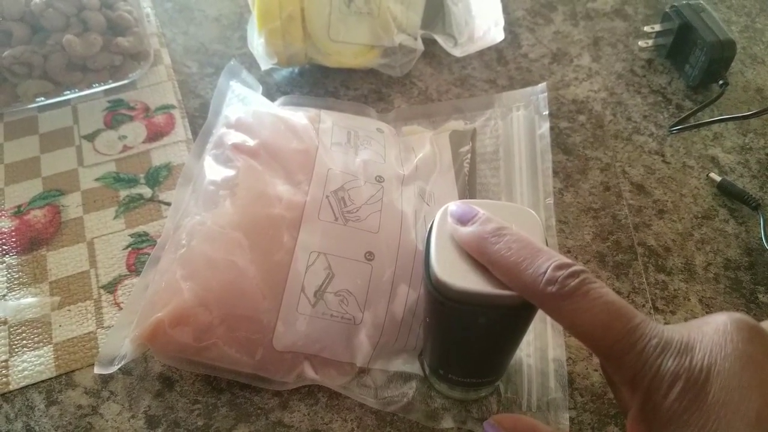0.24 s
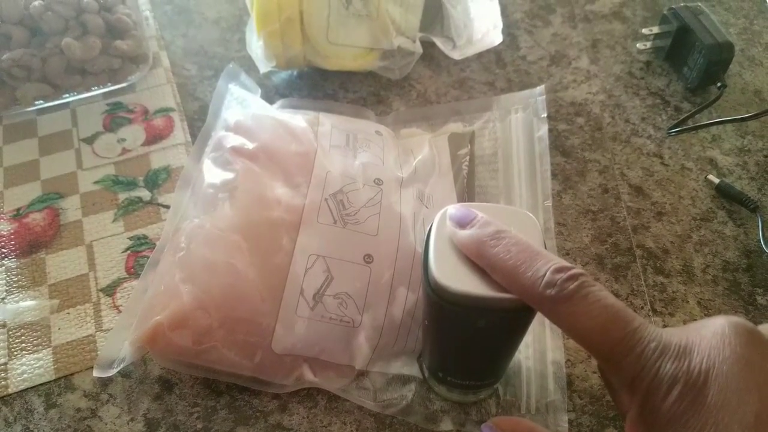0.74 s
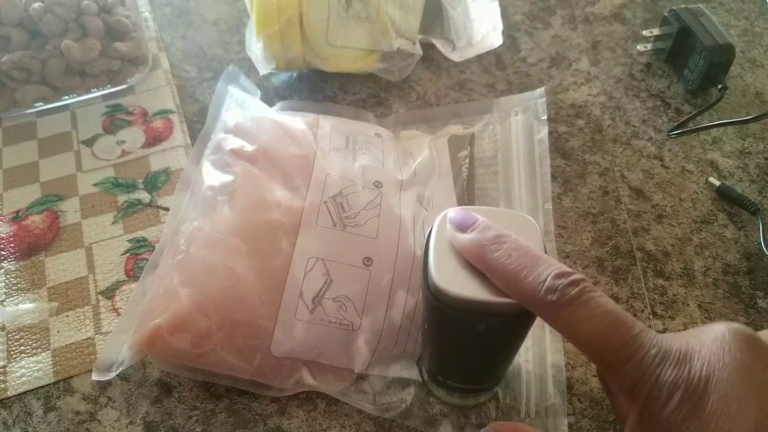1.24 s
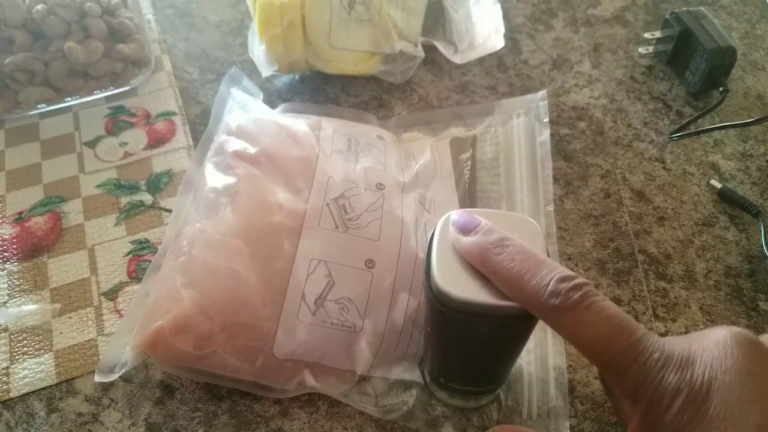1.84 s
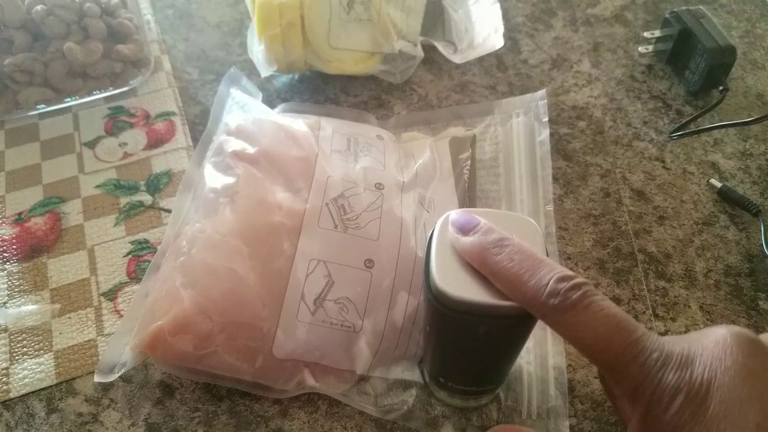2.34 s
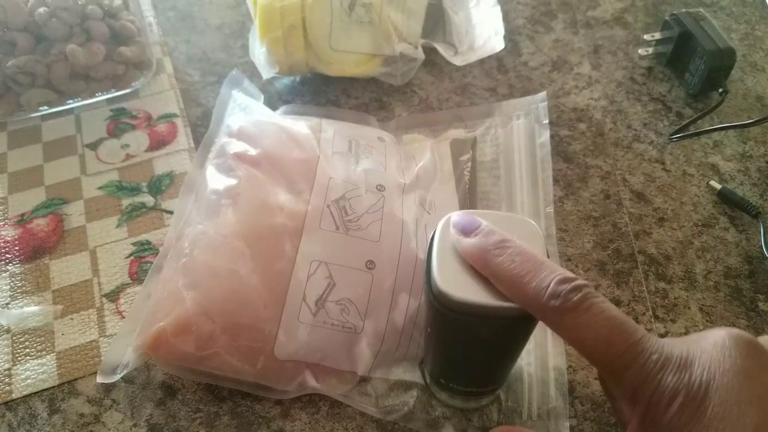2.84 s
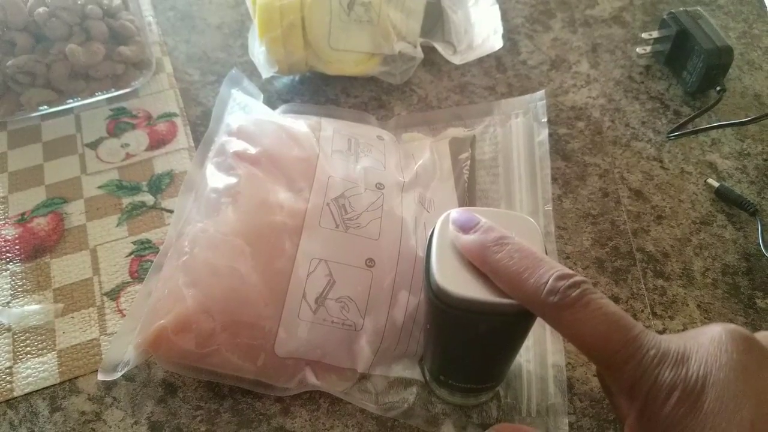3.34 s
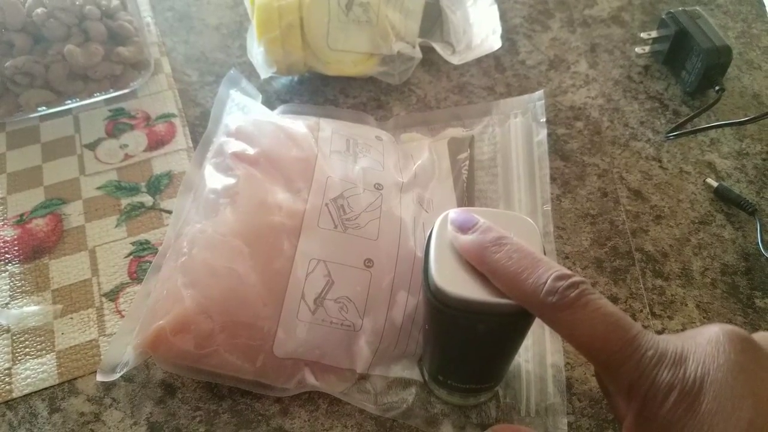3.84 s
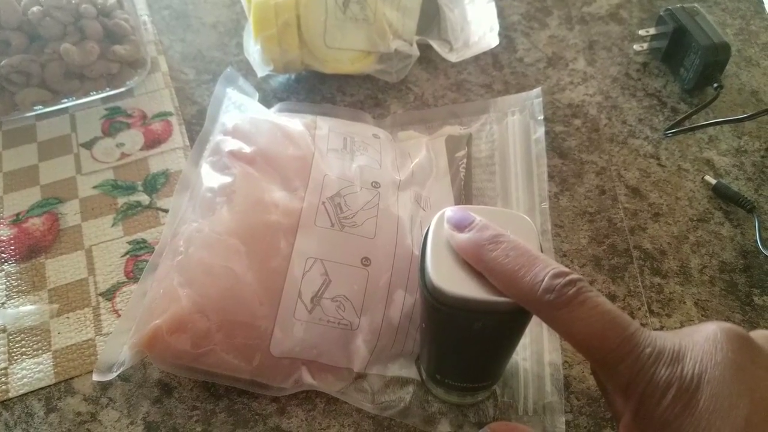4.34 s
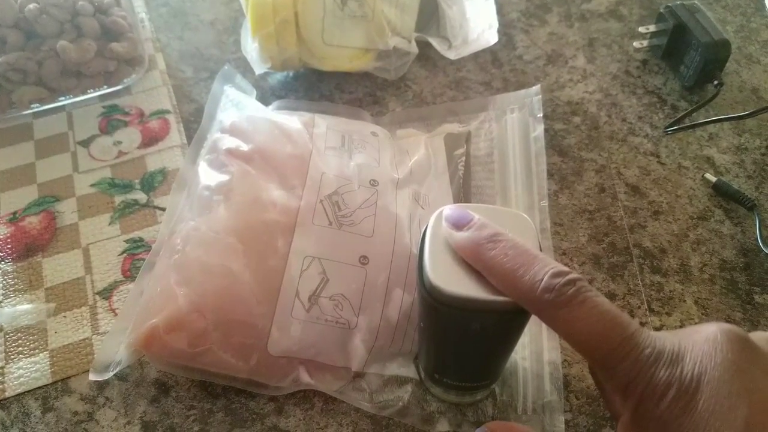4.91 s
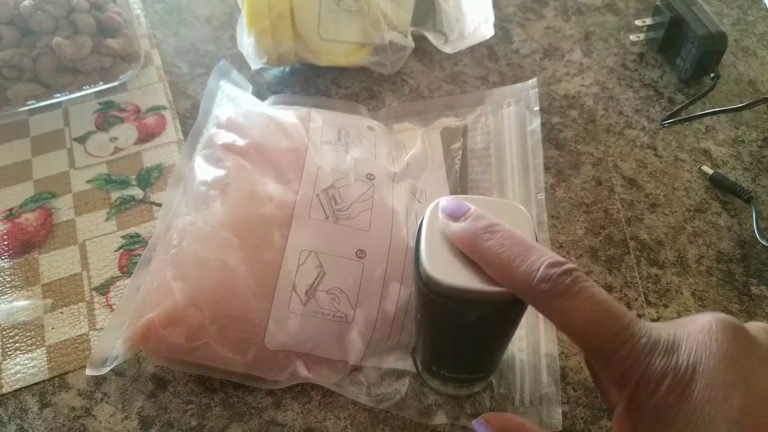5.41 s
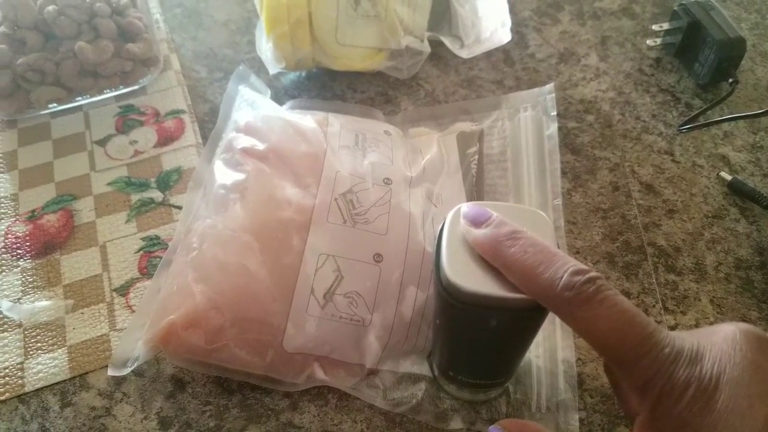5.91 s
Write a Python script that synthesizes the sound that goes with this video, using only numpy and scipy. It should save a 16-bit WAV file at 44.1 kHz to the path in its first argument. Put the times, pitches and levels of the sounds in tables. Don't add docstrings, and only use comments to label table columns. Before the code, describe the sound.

A small handheld vacuum pump buzzes steadily up close, hissing faintly and sagging slightly in pitch, with dull hollow wooden knocks further off.

```python
import sys
import numpy as np
from scipy import signal
from scipy.fft import rfft, irfft, next_fast_len
from scipy.io import wavfile
from scipy.ndimage import uniform_filter1d

SR = 44100
rng = np.random.default_rng(int(sys.argv[2]) if len(sys.argv) > 2 else 0)


def elevation(decibels):
    levels = np.asarray(decibels, float)
    return 10 ** (levels / 20)


def waveform_to_disk(signal):
    frames = np.transpose(np.atleast_2d(signal))
    scaled = np.clip(frames, -1, 1) * 32767
    samples = np.round(scaled).astype(np.int16)
    wavfile.write(sys.argv[1], SR, samples)


N = 272097

# time_s, stroke_hz
PUMP_SPEED = [(0.0, 198.5), (0.12, 197.1), (0.25, 196.0), (0.5, 195.2), (1.0, 194.4), (1.12, 193.8),
              (1.75, 193.7), (2.38, 193.6), (2.75, 193.2), (3.0, 192.4), (4.75, 192.5), (5.12, 191.9),
              (5.38, 192.3), (6.17, 192.3)]
# left_db, right_db, left_change_db, right_change_db
STROKE_LEVELS = [(-44.5, -44.5, -1, -1), (-44.5, -46.5, -4.0, -2.5), (-52.5, -51.5, 3.5, -2.5),
                 (-55, -59, 4.5, 6.5), (-56, -59.5, 3, 12), (-66.5, -77, 11, 16), (-57, -50.5, -6.5, -8.5),
                 (-57.5, -50.5, -5.0, -17.5), (-75, -51, 11, -19), (-54.5, -49.5, -4.0, -10.5),
                 (-55, -48.5, -42, -2.5), (-93, -57, 17, 1), (-87, -55, 20, 0), (-80.0, -57, 33, 5),
                 (-69.5, -60.5, 7.0, -20), (-61.5, -58, -2, 2)]
UNEVEN_ORDERS = (1, 4, 5, 7, 8, 10, 13, 14, 17, 23, 26, 28, 29, 31, 32, 34, 35, 37, 38, 40, 41, 43, 44)
# left_db, right_db, change_db
UNEVEN_LEVELS = [(-62, -65, 4), (-57, -61.5, 0.5), (-67, -65.5, 10), (-87, -69, 8), (-57.5, -85, -14),
                 (-58.5, -127, -0.5), (-69.5, -58.5, -4.5), (-75, -64, -9.5), (-68, -62, -7), (-96, -59, 8),
                 (-79, -71.5, 15), (-67.5, -52, -3.5), (-67, -65, 11), (-56.5, -54.5, 1),
                 (-57, -54.5, -11.5), (-87, -65, 0), (-62, -68, -6), (-55, -52, -9), (-55, -55, -8),
                 (-65, -66.5, -6), (-94, -60, 7), (-114, -68, 7), (-74.5, -62.5, 6)]
HUM_TIMING = [
    [(.013, .03, .017, .06), (.010, -.01, .027, .12)],
    [(-.146, -.23, 0, .44), (-.166, -.27, .163, .08)],
    [(.083, -.43, .016, -.13), (.074, -.47, -.13, -.05)],
]
# cycles_per_turn, change_db
LOOSE_CASING = [(30, 0), (34, 5), (37, -7.5), (48, -7)]
# pitch_hz, left_db_per_hz, right_db_per_hz
RATTLE_SPECTRUM = [(29.7, -102, -84.5), (45.3, -76, -90), (62, -87, -89), (81.6, -78, -78.5),
                   (137, -84.5, -87.5), (246, -79.5, -80), (325, -82, -87.5), (447, -90.5, -88.5),
                   (690, -89, -91.5), (1050, -107, -85.5), (1500, -84.5, -92), (1880, -92, -86),
                   (2690, -99.5, -84.5), (3010, -102, -101.5)]
# pitch_hz, left_db_per_hz, right_db_per_hz
HISS_SPECTRUM = [(3125, -95, -91.5), (3210, -91.5, -86), (3760, -99, -104), (4230, -95.5, -94),
                 (4860, -101, -102), (5320, -102, -101), (5740, -87, -92.5), (6460, -96, -92),
                 (7370, -99, -108), (8260, -93, -89), (10500, -94.5, -94.5), (11220, -87, -98),
                 (11570, -96.5, -101), (13800, -92, -99), (16200, -92.5, -94)]
# shaft_angle_turns, level_db
FLAPS = [
    (.165, 0),
    (.165 + 1 / 3, -3),
    (.165 + 2 / 3, -7),
    (.02, -3),
    (.02 + 1 / 3, -6),
    (.02 + 2 / 3, 0),
]
# pitch_hz, width_hz, left_db, right_db
FLAP_RINGS = [(3320, 130, -7.5, -7), (3290, 470, -15, -1.5), (4274, 48, -0.5, 8), (4750, 150, -3, 4),
              (5610, 186, 7, -8), (5970, 390, -7.5, -11), (6380, 370, -35, 2), (6780, 155, -2.5, 8),
              (7110, 150, 7, 0), (11120, 80, 5, -3)]
# start_s, peak_db
KNOCK_TIMES = [(0.219, -38), (0.353, -39.5), (0.632, -42), (1.317, -36), (2.175, -36.5), (3.651, -38),
               (3.75, -43), (4.411, -40), (4.677, -55), (4.769, -58), (5.431, -42), (6.002, -42)]
# start_s, length_s, start_pitch_hz, end_pitch_hz, level_db
SQUEAK_SLIDE = (3.49, .13, 825, 865, -56)


def colour(x, gain, lag=0.):
    size = next_fast_len(N + SR // 10)
    hz = np.arange(size // 2 + 1) * SR / size + 1e-3
    delay = np.exp(-2j * np.pi * hz * lag / SR)
    return irfft(rfft(x, size) * gain(hz) * delay, size)[:N]


def ring(centre_hz, width_hz):
    return lambda hz: 1 / (1 + 1j * (hz / centre_hz - centre_hz / hz) * centre_hz / width_hz)


def unit(x):
    return x / np.sqrt(np.mean(x ** 2))


def walk(rate_hz):
    k = int(SR / rate_hz)
    steps = np.repeat(rng.standard_normal(N // k + 1), k)
    return unit(uniform_filter1d(uniform_filter1d(steps, k), k)[:N])


def two_ports(gate, alike):
    shared, left, right = rng.standard_normal((3, N)) * gate
    alike = np.clip(alike, 0, 1)
    return [np.sqrt(alike) * shared + np.sqrt(1 - alike) * own for own in (left, right)]


def puff(turn, at, sharp, rest):
    stroke_angle = 2 * np.pi * (3 * turn - at)
    return unit(rest + np.exp(sharp * (np.cos(stroke_angle) - 1)))


def spread_noise(table, gate, alike, lag):
    pitch_hz, *port_db = np.transpose(table)

    def shape(db):
        return lambda hz: elevation(np.interp(np.log(hz), np.log(pitch_hz), db)) * np.sqrt(SR / 2)

    noises = two_ports(gate, alike)
    return np.array([colour(x, shape(db), late) for x, db, late in zip(noises, port_db, (0., lag))])


def hum(turn, slack):
    out = np.zeros((2, N))
    rows = [(3 * n, *row) for n, row in enumerate(STROKE_LEVELS, start=1)]
    rows += [(k, *row, row[-1]) for k, row in zip(UNEVEN_ORDERS, UNEVEN_LEVELS)]
    for k, *db in rows:
        wobble_db = (0.65 + 0.99 * (k % 3 > 0)) * walk(7.6)
        loose_db = np.interp(k, *np.transpose(LOOSE_CASING)) * slack ** 3
        for port in range(2):
            push_and_ring = np.reshape(HUM_TIMING[k % 3][port], (2, 2))
            lag, lead = push_and_ring[int(k >= 17)]
            level_db = db[port] + db[2 + port] * slack + loose_db + wobble_db
            out[port] += elevation(level_db) * np.sqrt(2) * np.cos(2 * np.pi * (k * (turn - lag) + lead))
    return out


def casing_rattle(turn):
    table = RATTLE_SPECTRUM + [(3300, -125, -125)]
    gate = puff(turn, at=0.021, sharp=0.99, rest=6.3)
    return elevation(1.46) * spread_noise(table, gate, alike=0.9, lag=5.1)


def air_hiss(turn):
    table = [(2660, -125, -125)] + HISS_SPECTRUM
    gate = puff(turn, at=0.4, sharp=2.9, rest=1.13)
    return elevation(-0.5) * spread_noise(table, gate, alike=0.15, lag=29.96)


def flap_clicks(turn, flaps):
    clicks = 0
    for at, flap_db in flaps:
        past = turn - at + .5
        jitter, size = rng.standard_normal((int(past.max()) + 2, 2))[past.astype(int)].T
        away = past % 1 - .5 - .0004 * jitter
        clicks = clicks + elevation(flap_db + 1.2 * size) * np.exp(-(away / .0015) ** 2)
    return clicks


def flap_body(port, low):
    def gain(hz):
        total = 0
        for j, mode in enumerate(FLAP_RINGS):
            other_db = 0 if (mode[0] < 5200) == low else -8
            total = total + (-1) ** j * elevation(mode[2 + port] + other_db) * ring(mode[0], mode[1])(hz)
        return total / (1 + (3100 / hz) ** 12)
    return gain


def valves(turn, level_db):
    out = 0
    for flaps, low in ((FLAPS[:3], 0), (FLAPS[3:], 1)):
        clicks = flap_clicks(turn, flaps)
        ports = [colour(clicks, flap_body(port, low), late) for port, late in enumerate((0., 34.))]
        out = out + np.array(ports)
    return elevation(level_db) * unit(out)


def whistle(turn, level_db):
    gate = puff(turn, at=0.66, sharp=2.2, rest=0.26) * elevation(0.65 * walk(25.1))
    left, right = two_ports(gate, alike=0.57)
    slit = lambda hz: ring(12850, 750)(hz) ** 2
    left = elevation(5.0) * unit(colour(left, slit))
    right = elevation(-2.5) * unit(colour(right, slit, 14.1))
    return elevation(level_db) * np.array([left, right])


def fridge():
    left, right = two_ports(1., alike=0.97)

    def body(hz):
        return ring(61, 16)(hz) ** 2 + elevation(-14.0) * ring(92, 12)(hz) + elevation(-12.5) * ring(120, 8)(hz)

    return np.array([elevation(-61.5) * unit(colour(left, body)), elevation(-64.0) * unit(colour(right, body))])


def knocks(t):
    out = np.zeros((2, N))
    pan_db = np.array([[4], [-4]]) / 2
    for start_s, peak_db in KNOCK_TIMES:
        age = np.maximum(t - start_s, 0)
        swell = (1 - np.exp(-age / .003)) * np.exp(-np.log(1000) * age / .07)
        out += elevation(peak_db + 2.5 + pan_db) * swell * np.sin(2 * np.pi * 341.4 * age)
    return out


def squeak(t):
    start_s, length_s, start_hz, end_hz, level_db = SQUEAK_SLIDE
    along = np.clip((t - start_s) / length_s, 0, 1)
    cycles = np.cumsum(start_hz + (end_hz - start_hz) * along) / SR
    tone = np.sin(np.pi * along) * np.sin(2 * np.pi * cycles)
    return elevation(level_db + np.array([[2.5], [-2.5]])) * tone


def scene():
    t = np.arange(N) / SR
    stroke_hz = np.interp(t, *np.transpose(PUMP_SPEED))
    turn = np.cumsum(stroke_hz * (1 + .0003 * walk(30.))) / (3 * SR) + .825
    tight_hz, free_hz = 192.3, 198.3
    slack = np.clip((stroke_hz - tight_hz) / (free_hz - tight_hz), 0, 1) ** 0.77
    air = elevation(-1.5 * slack) * (air_hiss(turn) + valves(turn, level_db=-57.0))
    pump = hum(turn, slack) + casing_rattle(turn) + air + whistle(turn, level_db=-57.5)
    return pump + fridge() + knocks(t) + squeak(t)


def low_pass(x):
    return signal.sosfilt(signal.butter(12, 15500, fs=SR, output="sos"), x)


def record(dry):
    return low_pass(dry)


dry = scene()
out = record(dry)
waveform_to_disk(out)
```